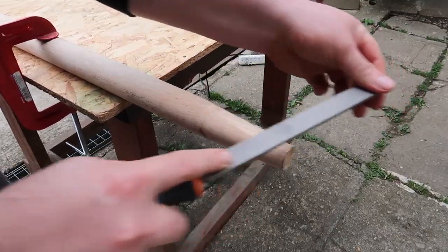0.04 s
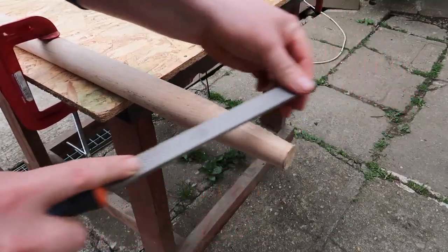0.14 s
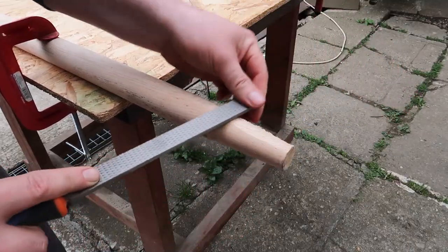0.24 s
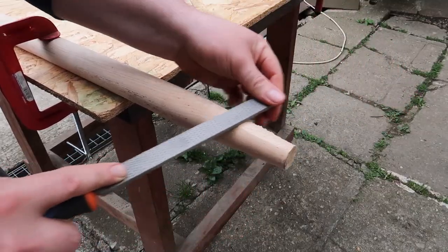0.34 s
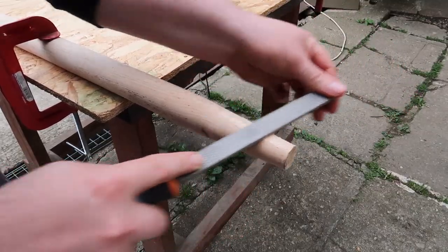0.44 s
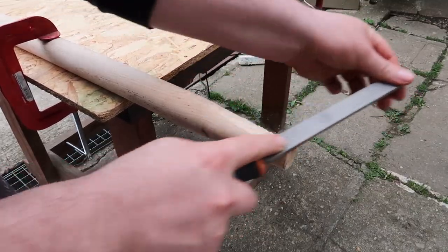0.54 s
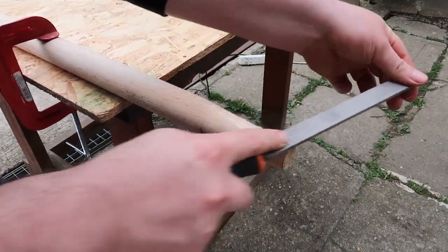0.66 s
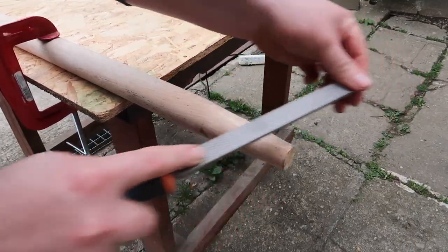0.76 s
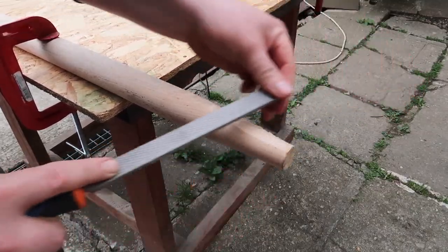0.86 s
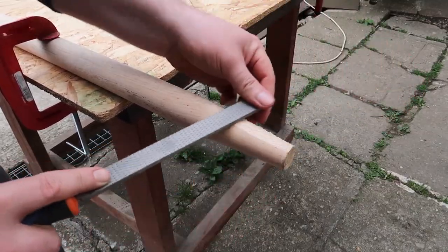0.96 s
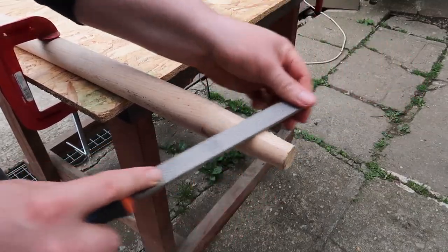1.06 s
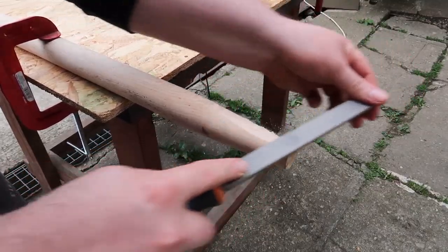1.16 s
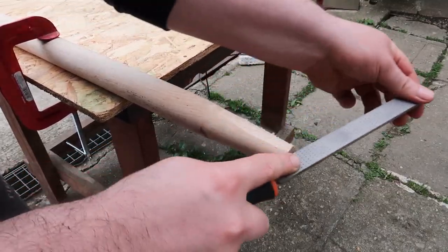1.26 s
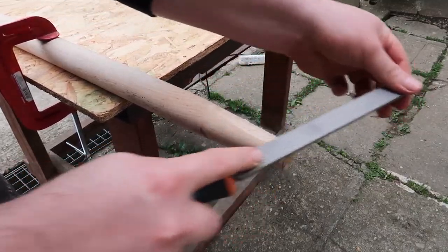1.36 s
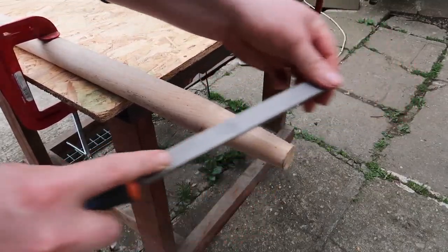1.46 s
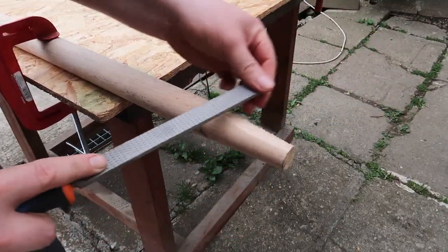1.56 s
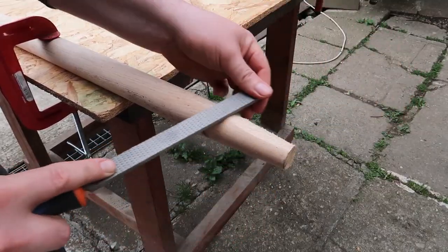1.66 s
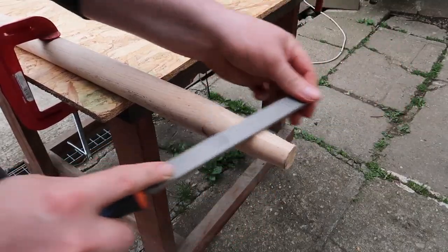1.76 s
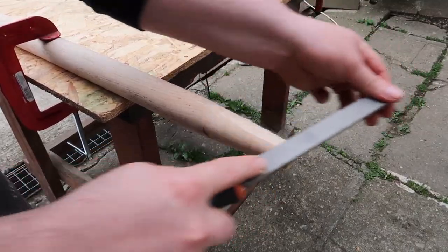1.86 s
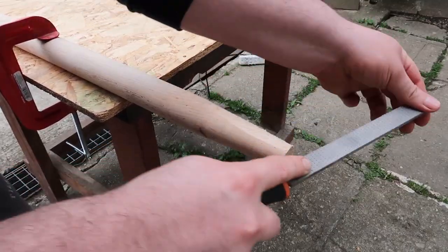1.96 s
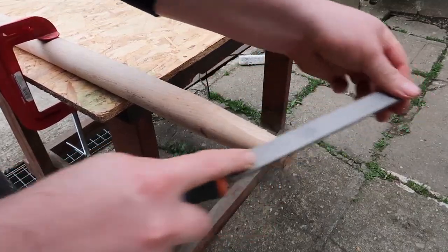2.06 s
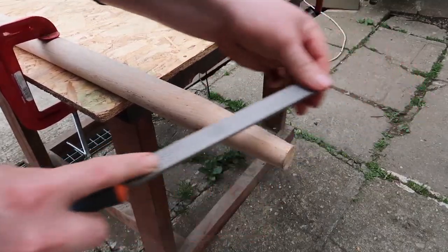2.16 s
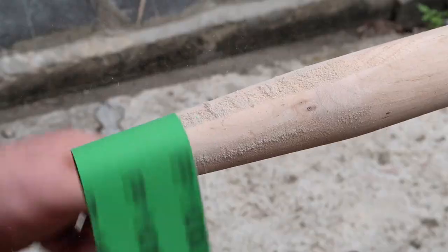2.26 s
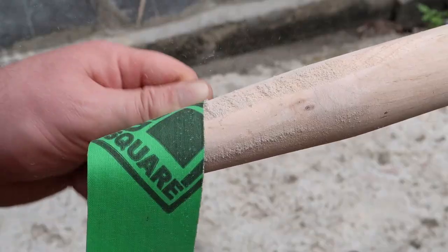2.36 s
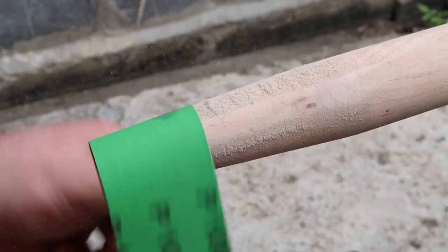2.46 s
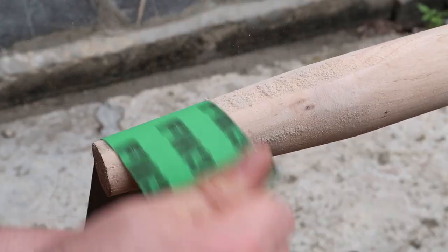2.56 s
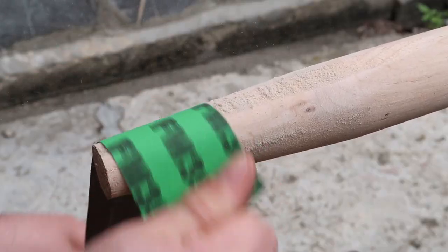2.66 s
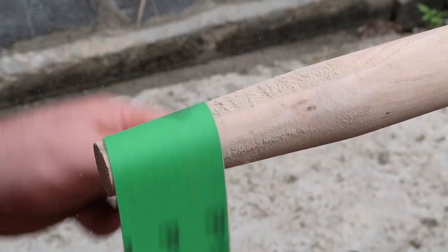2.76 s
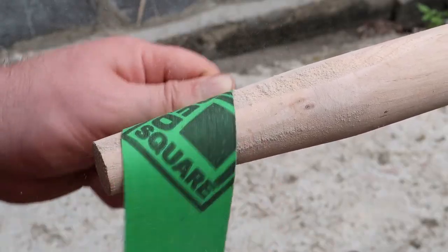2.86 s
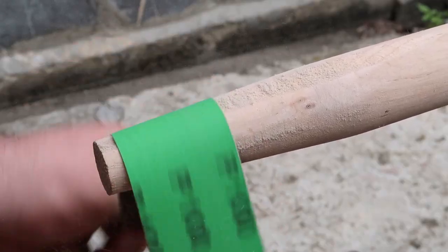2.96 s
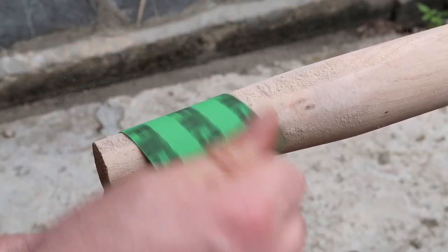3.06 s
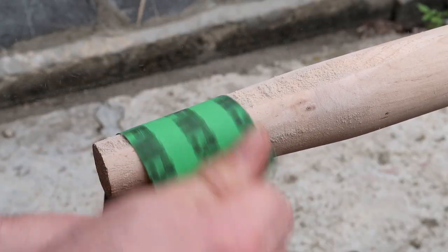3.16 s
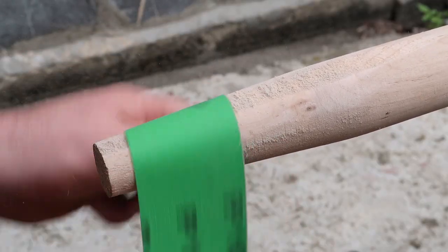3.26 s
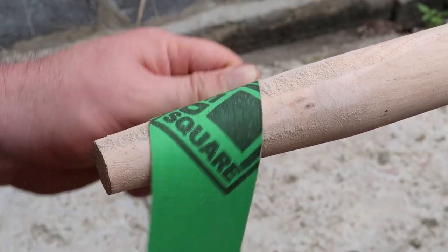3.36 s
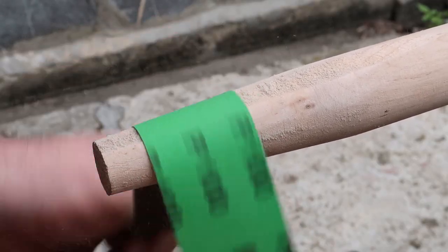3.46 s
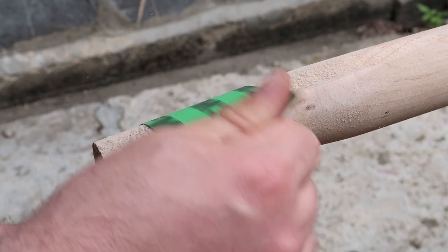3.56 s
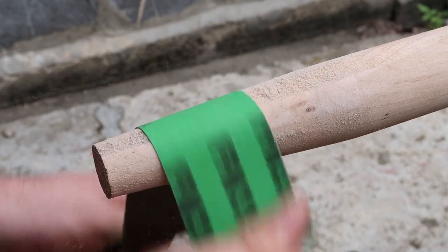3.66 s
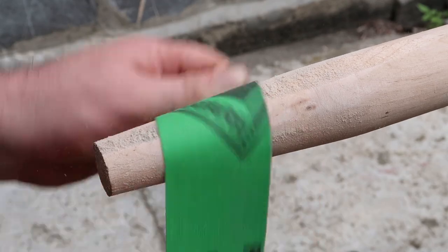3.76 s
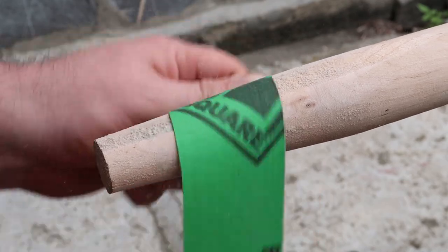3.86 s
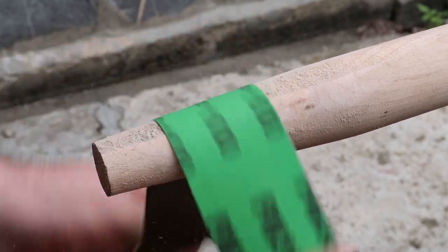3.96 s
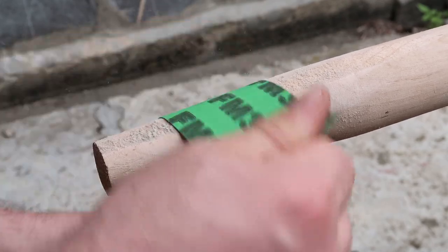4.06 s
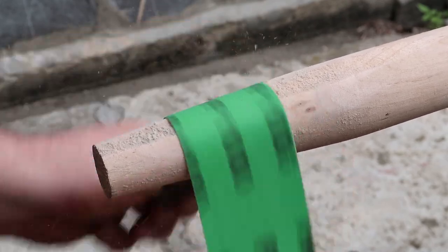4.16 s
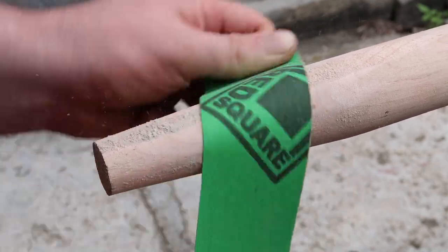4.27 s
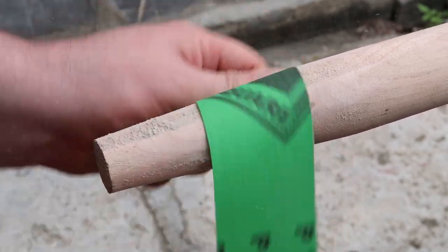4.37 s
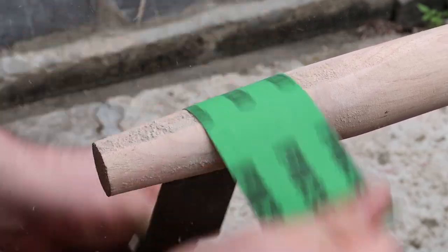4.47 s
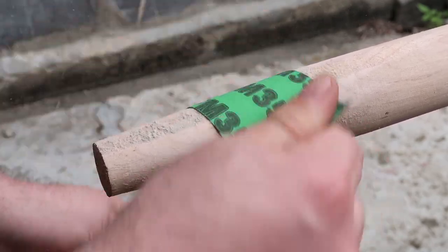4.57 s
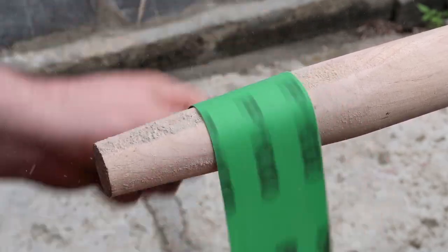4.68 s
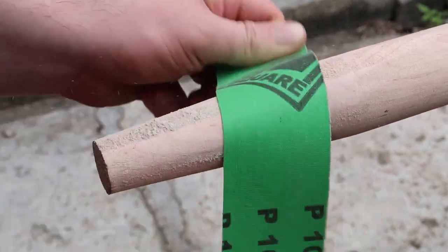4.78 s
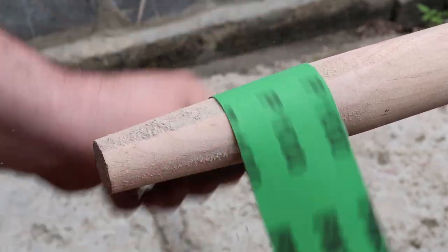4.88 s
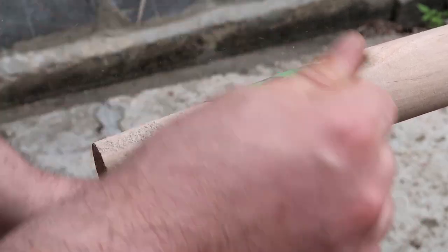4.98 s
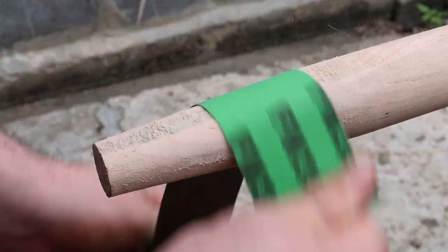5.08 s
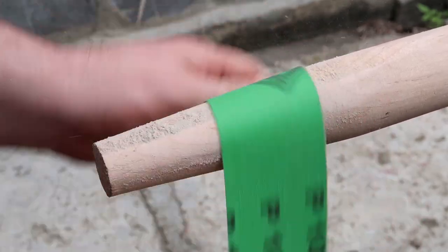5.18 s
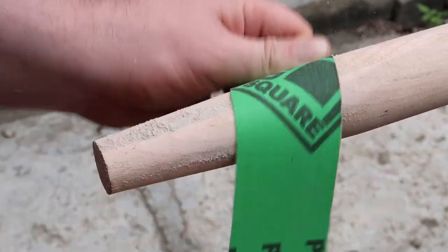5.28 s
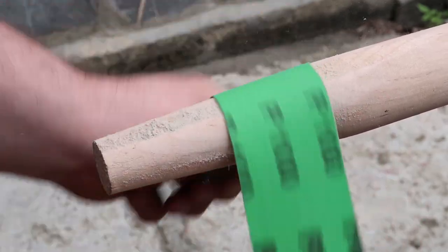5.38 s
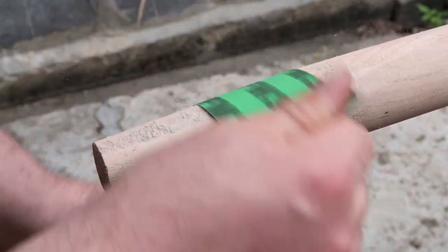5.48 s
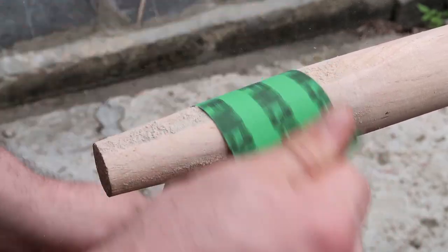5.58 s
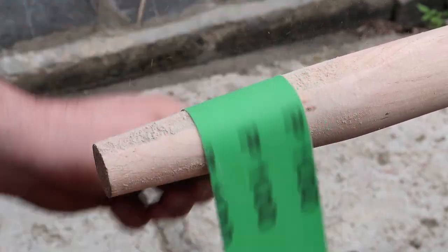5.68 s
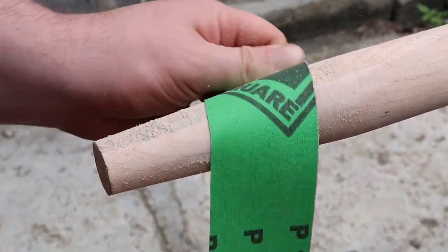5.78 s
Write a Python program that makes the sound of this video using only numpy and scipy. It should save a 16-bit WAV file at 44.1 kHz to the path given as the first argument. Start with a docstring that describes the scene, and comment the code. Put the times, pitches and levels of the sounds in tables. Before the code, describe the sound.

Close up in a quiet yard, the tail of a file stroke is followed by three more pushes, each starting with a dull knock and growing into a coarse, resonant rasp. A dove and a small trilling bird call faintly. Just after two seconds, an abrasive strip begins fast, steady to-and-fro sanding, bright and gritty, about four pulls a second, until the end.

```python
"""A wooden handle clamped to an outdoor bench is shaped by hand, heard from close by.
It opens in the last moments of a file push; three more follow, each begun by a knock of the file:
noise grains in time with the teeth excite wood resonances. A bird, gliding tones, and a dove, arched
tones, call faintly meanwhile. After two seconds an abrasive strip is pulled quickly to and fro, its
grit noise read off at the sliding speed. Filtered noise makes the air and the faint far traffic."""
import sys
import numpy as np
from scipy import signal
from scipy.fft import rfft, irfft, next_fast_len
from scipy.io import wavfile
from scipy.ndimage import map_coordinates

SR = 44100
rng = np.random.default_rng(int(sys.argv[2]) if len(sys.argv) > 2 else 0)


def file_out(sig):
    """Save sig as 16-bit WAV at sys.argv[1]."""
    # one column per channel
    cols = np.atleast_2d(sig).T
    # limit, then scale
    lim = np.clip(cols, -1, 1)
    pcm = np.round(lim * 32767).astype(np.int16)
    wavfile.write(sys.argv[1], SR, pcm)


N = 257103
TIME = np.arange(N) / SR
SIZE = next_fast_len(N + SR // 2)
FREQ = np.maximum(np.arange(SIZE // 2 + 1) * SR / SIZE, 1)
# Signals of two rows hold mid and side.


def undb(db):
    """Level: decibels become an amplitude ratio."""
    return 10 ** (np.asarray(db) / 20)


def unit(x):
    """Normalisation: the rms becomes 1."""
    return x / np.sqrt(np.mean(x ** 2))


def apply(x, response):
    """Linear filtering: the spectrum is multiplied by a frequency response."""
    return irfft(rfft(x, SIZE) * response, SIZE)[..., :N]


def colour(points):
    """Minimum phase: folding the cepstrum makes a response through (Hz, dB) points causal."""
    hz, db = np.transpose(points)
    log_gain = np.log(undb(np.interp(np.log(FREQ), np.log(hz), db)))
    cepstrum = irfft(log_gain, SIZE)
    return np.exp(rfft(np.r_[cepstrum[0], 2 * cepstrum[1:SIZE // 2]], SIZE))


def resonances(modes):
    """Modal resonance: each mode adds a narrow peak to a flat response; the factors multiply."""
    peaks = [1 + undb(db) / (1 + 1j * (FREQ ** 2 - hz ** 2) / (FREQ * width)) for hz, width, db in modes]
    return np.prod(peaks, axis=0)


def below(hz):
    """Second-order low-pass response."""
    return 1 / (1 + 1j * np.sqrt(2) * FREQ / hz - (FREQ / hz) ** 2)


def above(hz):
    """Second-order high-pass response."""
    return below(hz) * (FREQ / hz) ** 2


def share_under(hz):
    """Crossover: the share of each frequency that lies under a soft edge."""
    return 1 / (1 + (FREQ / hz) ** 4)


def echoes(t60, wet_db):
    """Reverberation: a direct sound and a dense tail that decays by 60 dB in t60 seconds."""
    tail = rng.standard_normal(N) * np.exp(-np.log(1000) * TIME / t60)
    wet = undb(wet_db) * rfft(unit(tail), SIZE) / np.sqrt(N)
    return (1 + wet) / np.sqrt(1 + undb(2 * wet_db))


def walk(rate):
    """Random modulation: noise low-passed at a rate in Hz, with an rms of 1."""
    return unit(apply(rng.standard_normal(N), below(rate)))


def grains(rate, spread_db):
    """Shot noise: tiny fractures of uneven size, at a given rate per second."""
    strikes = rng.random((2, N)) < rate / SR
    sizes = unit(rng.standard_normal((2, N)) * undb(spread_db * rng.standard_normal((2, N))))
    return strikes * sizes / np.sqrt(np.clip(rate / SR, 1e-3, 1))


PATCHY_FROM_HZ = 1960  # patches reach their full depth above this


def patchy(x, patch_db, rate, width_hz):
    """Random modulation: patches of the spectrum swell and fade independently, deepest in the treble."""
    hz, s, frames = signal.stft(x, SR, nperseg=512)
    chance = rng.standard_normal((256, 512))
    places = np.meshgrid(hz / width_hz, s * rate, indexing="ij")
    field = unit(map_coordinates(chance, places, order=3, mode="wrap"))
    depth_db = patch_db * np.minimum(hz / PATCHY_FROM_HZ, 1)[:, None]
    gain = undb(depth_db * field)
    gain = gain / np.sqrt(np.mean(gain ** 2, axis=1, keepdims=True))
    return signal.istft(frames * gain, SR)[1][..., :N]


def arch(start, length):
    """Half-sine envelope: a smooth rise and fall between 0 and 1."""
    return np.sin(np.pi * np.clip((TIME - start) / length, 0, 1))


def held(start, end, attack_s, release_s):
    """Envelope: linear attack, hold and exponential release."""
    return np.clip((TIME - start) / attack_s, 0, 1) * np.exp(-np.maximum(TIME - end, 0) / release_s)


def passing(s, half):
    """Approach and recession: the level peaks at s and halves at a distance of half, in seconds."""
    return 1 / (1 + ((TIME - s) / half) ** 2)


def tone(hz):
    """Frequency modulation: a sine of moving pitch, with an rms of 1."""
    return unit(np.sin(2 * np.pi * np.cumsum(hz) / SR))


# Spectrum of the open air. Each row: frequency in Hz, relative level in dB.
AIR_COLOUR = [(20, -21.5), (48, -2), (90, -9), (200, -11), (500, -15), (1000, -18), (2000, -25.5),
              (4000, -27), (8000, -39), (15000, -54)]
AIR_DB = -60.5  # mean level in dB


def open_air():
    """Ambient noise: coloured noise whose level wanders at random."""
    noise = unit(apply(rng.standard_normal((2, N)), colour(AIR_COLOUR)))
    return noise * undb(AIR_DB + 2.8 * walk(4.5))


# Far vehicles. Each row: nearest moment in s, half length in s, level there in dB before flutter.
VEHICLES = [(4.407, 0.14, -59), (5.298, 0.53, -66)]


def traffic():
    """Distant noise sources: dull tyre noise swells and recedes with a slight flutter of level."""
    tyres = colour([(50, -18), (110, -17.0), (250, 0.0), (450, 2.5), (700, -8.0), (2000, -59.0), (8000, -68)])
    noise = unit(apply(rng.standard_normal((2, N)), tyres))
    swell = sum(undb(db) * passing(s, half) for s, half, db in VEHICLES)
    return noise * swell * undb(1.68 * walk(13.0))


# nearest moment and half length in s, centre in Hz, level in dB at the nearest moment
RUMBLE_S, RUMBLE_HALF_S, RUMBLE_HZ, RUMBLE_DB = 1.85, 0.98, 44, -63


def low_rumble():
    """Narrow-band noise: a low rumble swells and fades once."""
    band = (above(RUMBLE_HZ) * below(RUMBLE_HZ)) ** 2
    noise = unit(apply(rng.standard_normal((2, N)), band))
    return noise * undb(RUMBLE_DB) * passing(RUMBLE_S, RUMBLE_HALF_S)


# Coos of a dove. Each row: start in s, length in s, top pitch in Hz, level in dB before the echoes.
DOVE_COOS = [(0.108, 0.22, 493, -58.5), (.325, 0.084, 535, -47), (0.705, 0.2, 463, -61),
             (2.14, 0.16, 507, -61.5)]
COO_ARCH, COO_WAVER_HZ = 0.0383, 18  # rise and fall as a share of pitch; rms random waver in Hz


def dove():
    """Frequency glide: each coo rises and sinks with its loudness, blurred by reflecting walls."""
    coos = np.zeros(N)
    for s, length, hz, db in DOVE_COOS:
        swell = arch(s, length)
        pitch = hz * (1 + COO_ARCH * (swell - 1)) + COO_WAVER_HZ * walk(33)
        coos += swell * undb(db) * tone(pitch)
    return np.array([apply(coos, echoes(t60=0.68, wet_db=-6)) for _ in range(2)])


# Chirrs of a small bird. Each row: start in s, length of the falling trill in s,
# whistle level in dB and starting trill level in dB, both before flutter and echoes.
BIRD_CHIRRS = [(0.146, 0.12, -62, -58.5), (.778, 0.33, -54, -55), (1.486, 0.11, -81, -70),
               (1.78, 0.073, -59.5, -55.5)]
WHISTLE_HZ, WHISTLE_S = 6290, 0.029  # mean pitch and length
TRILL_HZ, TRILL_DEPTH_HZ = 5500, 604  # starting pitch; scale of the swing about the falling pitch
FALL_HZ_PER_S, FADE_DB_PER_S = 7700, -55
TRILL_SWELL_S = 0.073  # the trill begins to swell in this long before the whistle


def small_bird():
    """Frequency modulation: short whistles break into falling trills, blurred by reflecting walls."""
    song = np.zeros(N)
    trill = 0.59 * np.sin(2 * np.pi * 70 * TIME) + 0.48 * walk(249)
    for s, length, whistle_db, trill_db in BIRD_CHIRRS:
        age = np.clip(TIME - s - WHISTLE_S, 0, length)
        song += arch(s, WHISTLE_S) * undb(whistle_db) * tone(WHISTLE_HZ + 90 * trill)
        pitch = TRILL_HZ - FALL_HZ_PER_S * age + TRILL_DEPTH_HZ * trill + 200 * walk(24.73)
        end = s + WHISTLE_S + length
        swell = held(s - TRILL_SWELL_S, end, 2 * TRILL_SWELL_S + WHISTLE_S, 0.0091)
        song += swell * undb(trill_db + FADE_DB_PER_S * age) * tone(pitch)
    return np.array([apply(song * undb(3.2 * walk(60)), echoes(t60=0.14, wet_db=7.0)) for _ in range(2)])


SHUDDER_DB = -16  # the shuddering bench, relative to the drag


def bench_shudder(drag):
    """Forced vibration: low noise in the bench follows the drag of the file."""
    return unit(apply(rng.standard_normal((2, N)), above(33) * below(73))) * drag * undb(SHUDDER_DB)


# The clamped handle and the bench rock.
# Each row: start in s, frequency in Hz, level in dB before the onset and decay, 60 dB decay time in s.
ROCKING = [(.28, 41, -44.5, 0.51), (0.344, 72, -32, 0.12), (1.558, 54.4, -40, 0.15),
           (2.014, 199, -23, 0.16)]
THUD_SIDE_DB = 0  # side minus mid, before the stereo spread


def thuds():
    """Damped oscillation: low swings of handle and bench set in quickly and decay exponentially."""
    out = np.zeros((2, N))
    for s, hz, db, t60 in ROCKING:
        age = np.maximum(TIME - s, 0)
        swing = undb(db) * (1 - np.exp(-age / 0.0017)) * np.exp(-np.log(1000) * age / t60)
        mid = np.sin(2 * np.pi * hz * age)
        side = undb(THUD_SIDE_DB) * np.cos(2 * np.pi * hz * age)
        out += swing * np.array([mid, side])
    return out


# The file lands on the wood.
# Each row: moment in s, peak level in dB before the echoes, contact hardness as a low-pass edge in Hz.
FILE_LANDINGS = [(0.374, -21.5, 800), (1.076, -23.5, 800), (1.747, -28.5, 1100)]
# Spectrum of the knock. Each row: frequency in Hz, level in dB.
KNOCK_COLOUR = [(60, -31), (200, 0), (350, -8), (560, 4.5), (800, -1.5), (1300, -12.5), (5000, -15)]
# Resonances of handle, vice and file, also used by the rasp below.
# Each row: frequency in Hz, width in Hz, lift in dB.
HANDLE_MODES = [(203.7, 29, 6.5), (278.3, 12.5, 6), (325.4, 15, 9.5), (406, 22, 6), (475.4, 13.5, 6),
                (558, 30, -6), (789, 28, 2), (950, 28, 2), (1245, 84, -0.5), (1710, 17, 2), (1952, 12, -2),
                (2274, 190, 2), (2724, 24, -3), (8100, 200, 0)]


def landings():
    """Impact excitation: the file knocks on the handle, which rattles briefly in the vice."""
    out = np.zeros((2, N))
    wood = colour(KNOCK_COLOUR) * resonances(HANDLE_MODES)
    for s, db, hard_hz in FILE_LANDINGS:
        age = np.maximum(TIME - s, 0)
        # the steel chatters on the wood for a few milliseconds before it settles
        chatter = np.sin(2 * np.pi * 500 * age) * age / 0.0069 * np.exp(-age / 0.002)
        rattle = rng.standard_normal((2, N)) * (age > 0) * np.exp(-age / 0.0062)
        knock = apply(chatter + 1.5 * rattle, wood * below(hard_hz))
        out += undb(db) * knock / np.abs(knock).max()
    return out


# Pushes of the file. Each row: start in s, fastest moment in s, lift-off in s,
# drag level in dB and bite level in dB, both at full speed and before the echoes.
FILE_PUSHES = [(-.33, -.055, 0.033, -34.5, -38), (.395, .61, .702, -35, -37),
               (1.08, 1.29, 1.363, -33.5, -37), (1.75, 1.972, 2.022, -34, -36)]
# speeds at start and lift-off as shares of full speed (the start before its rise); shape of the rise
START_SPEED, LIFT_SPEED, SPEED_CURVE = .12, .42, 1.15
# the sound grows as these powers of the speed
DRAG_POWER, BITE_POWER, SPLINTER_POWER = 0.49, 1.49, 1.7
SPLINTER_DB = -3  # torn fibres, relative to the bite at full speed
PRESS_S, RELEASE_S = .03, .026  # the file takes hold and lets go
FREE_S = 0.018  # the teeth come free of the fibres sooner than the drag dies


def file_motion():
    """Kinematics: each push gathers speed and brakes; drag, bite and splinter are powers of speed."""
    drag, bite, splinter, speed = np.zeros((4, N))
    for start, fastest, lift, drag_db, bite_db in FILE_PUSHES:
        progress = np.clip((TIME - start) / (fastest - start), 0, 1)
        rise = np.sin(np.pi / 2 * progress ** SPEED_CURVE) ** 2
        brake = np.clip((TIME - fastest) / (lift - fastest), 0, 1) ** 2
        v = (START_SPEED + (1 - START_SPEED) * rise) * (1 - (1 - LIFT_SPEED) * brake)
        v = np.clip(v, 0, 1)
        contact = held(start, lift, PRESS_S, RELEASE_S)
        cutting = held(start, lift, PRESS_S, FREE_S)
        drag += contact * undb(drag_db) * v ** DRAG_POWER
        bite += cutting * undb(bite_db) * v ** BITE_POWER
        splinter += cutting * undb(bite_db + SPLINTER_DB) * v ** SPLINTER_POWER
        speed += contact * v
    return drag, bite, splinter, speed


# Broad spectrum of the rasping. Each row: frequency in Hz, level in dB.
RASP_COLOUR = [(30, -39), (70, -6.5), (140, -5), (200, -4), (380, -5.5), (700, -1.5), (1200, -7.5),
               (1600, -10.5), (2400, -12), (3300, -16.5), (5200, -21.5), (8200, -29), (13000, -37.5),
               (15500, -51)]
TOOTH_HZ = 520  # mean rate of passing tooth rows at full speed
CHATTER_DB, CHATTER_HZ = 0.5, 43.7  # the teeth bite unevenly: rms depth, rate
# the clamped wood rings on after each push: decay time, level, upper edge
RING_T60_S, RING_DB, RING_HZ = 0.52, -11, 1550


def file_strokes(drag, bite, splinter, speed):
    """Stick-slip: tooth rows load and tear fibres; slowly they drag, at speed they bite and splinter."""
    tooth_phase = np.cumsum(TOOTH_HZ * speed * (1 + .15 * walk(60))) / SR
    # each row of teeth loads the fibres and lets go; many small fractures ride on that push
    catch = unit(np.exp(-(tooth_phase % 1) / 1.6)) * undb(CHATTER_DB * walk(CHATTER_HZ))
    force = grains(4000 + 12000 * speed, spread_db=0.1) * catch
    rasp = apply(force, colour(RASP_COLOUR) * resonances(HANDLE_MODES))
    rasp = patchy(rasp, patch_db=2.5, rate=42, width_hz=263)
    lows, lows_and_mids = share_under(1200), share_under(4200)
    low = apply(rasp, lows)
    middle = apply(rasp, lows_and_mids - lows)
    top = apply(rasp, 1 - lows_and_mids)
    stroke = drag * unit(low) + (bite * middle + splinter * top) / np.std(middle)
    ringing = 1 + (echoes(RING_T60_S, RING_DB) - 1) * below(RING_HZ)
    return apply(stroke, ringing)


# a pull is fastest at these shares of its length, going out and coming back; shape of the ramp
OUT_FASTEST, BACK_FASTEST, PULL_CURVE = .58, .41, 1.15
REST_SHARE, CREEP_SPEED = 0.027, .03  # the hands rest at each turn while the strip creeps
TAUT_DB, TAUT_CURVE = 18.5, 4.4  # the strip tightens towards the far end of its travel


def strip_motion(turn):
    """Kinematics: sliding speed (share of full) and tension (dB); turn counts pulls, even ones going out."""
    fastest = np.where(turn % 2 < 1, OUT_FASTEST, BACK_FASTEST)
    phase = turn % 1
    ramp = np.minimum((phase - REST_SHARE) / (fastest - REST_SHARE), (1 - phase) / (1 - fastest))
    speed = CREEP_SPEED + np.sin(np.pi / 2 * np.clip(ramp, 0, 1)) ** PULL_CURVE
    reach = np.abs(np.sin(np.pi / 2 * turn)) ** 2
    return speed, TAUT_DB * reach ** TAUT_CURVE


# Spectrum of the grit before it is read off at speed. Each row: frequency in Hz, level in dB.
GRIT_COLOUR = [(600, -21), (1500, -23), (2500, 1), (3300, -0.5), (4500, 2), (6300, 0.5), (7800, -2.5),
               (12500, -6.5), (17000, -12), (20000, -8)]
# Broad ringing of the strip itself. Each row: frequency in Hz, width in Hz, lift in dB.
CLOTH_RESONANCES = [(2330, 230, -17.5), (4080, 410, -3.5)]
GRIT_DB = -45  # mean level at a speed of 1, before the filter and the force of the pull


def grit_hiss(speed):
    """Scanning of roughness: a surface read off at the sliding speed brightens and dulls with it."""
    surface = unit(apply(grains(20000, spread_db=-1.0), colour(GRIT_COLOUR)))
    travel = np.cumsum(np.clip(.42 + .6 * speed, .1, 1.2))
    hiss = np.array([map_coordinates(row, [travel], order=3, mode="wrap") for row in surface])
    loudness = speed ** 1.19 * undb(GRIT_DB + 1.0 * walk(57))
    hiss = apply(hiss * loudness, below(15600) * resonances(CLOTH_RESONANCES))
    hiss = patchy(hiss, patch_db=1.2, rate=12, width_hz=1500)
    return patchy(hiss, patch_db=2.5, rate=45, width_hz=200)


# Spectrum of the wood under the grit. Each row: frequency in Hz, level in dB.
WOOD_COLOUR = [(80, -27), (250, -33), (450, -12.5), (700, -11), (1200, -8.5), (1800, -3.5), (2700, -4),
               (4000, -6), (7000, -38), (15000, -60)]
# Resonances of the taut strip on the handle. Each row: frequency in Hz, width in Hz, lift in dB.
TAUT_STRIP_MODES = [(996, 48, 10), (1250, 43, 15.5), (1520, 74, 2), (2690, 540, -11.5)]
WOOD_DB = -56  # slack strip at a speed of 1, before smoothing and force


def sanded_wood(scratches, speed, tension_db):
    """Driven resonance: scratches excite the wood, hardest when the strip is taut."""
    wood = unit(apply(scratches, colour(WOOD_COLOUR) * resonances(TAUT_STRIP_MODES)))
    return wood * speed ** 1.67 * undb(WOOD_DB + tension_db)


# Spectrum of the strip dragging late in an outward pull. Each row: frequency in Hz, level in dB.
THRUM_COLOUR = [(80, -17), (280, 4), (750, 5), (1300, 4), (1800, -2), (2600, 11), (4000, -25), (15000, -62)]
THRUM_DB = -46.5  # at its height, before smoothing and force


def handle_thrum(turn):
    """Friction drive: towards the end of each outward pull the strip drags and the handle thrums."""
    drag = np.exp(-((turn % 2 - .78) / .11) ** 2)
    return unit(apply(grains(3000, spread_db=-3.5), colour(THRUM_COLOUR))) * drag * undb(THRUM_DB)


SCUFF_DB, SCUFF_RISE_S, SCUFF_FALL_S = -49, 0.01, 0.058  # level before the envelope and force


def reversal_scuff(scratches, since):
    """Breakaway from static friction: on each reversal the grit breaks loose with a short scuff."""
    noise = unit(apply(scratches, above(2600) * below(4500) ** 2))
    envelope = (1 - np.exp(-since / SCUFF_RISE_S)) * np.exp(-since / SCUFF_FALL_S)
    return noise * envelope * undb(SCUFF_DB)


# Pulls of the abrasive strip, alternately out and back; a pull lasts until the next row starts.
# Each row: start in seconds, relative force in dB.
STRIP_PULLS = [(2.255, -1), (2.499, -0.5), (2.747, -0.5), (2.983, -1), (3.241, -1), (3.478, -1),
               (3.715, -0.8), (3.95, -0.7), (4.189, -1), (4.422, -1.4), (4.675, -3.5), (4.909, -3),
               (5.139, -3), (5.39, -1.55), (5.65, -3.2), (5.91, -1.5)]
SMOOTHING_DB_PER_S = -1  # the wood quietens as it gets smooth


def sanding():
    """Sliding friction: hiss, wood, thrum and scuff follow the speed, tension and turns of the strip."""
    starts, force_db = np.transpose(STRIP_PULLS)
    turn = np.interp(TIME, starts, np.arange(len(starts)))
    pull = turn.astype(int)
    speed, tension_db = strip_motion(turn)
    speed = np.clip(speed * undb(.7 * walk(14)), .005, 2)
    roughness = undb(SMOOTHING_DB_PER_S * np.maximum(TIME - starts[0], 0))
    hiss = grit_hiss(speed)
    scratches = grains(4000 + 16000 * speed, spread_db=-0.5)
    wood = sanded_wood(scratches, speed, tension_db)
    thrum = handle_thrum(turn)
    since = np.maximum(TIME - starts[pull] - .015, 0)
    scuff = reversal_scuff(scratches, since)
    return (TIME > starts[0]) * undb(force_db[pull]) * (hiss + roughness * (wood + thrum) + scuff)


# Stereo spread of the near work, mostly in the treble.
# Each row: frequency in Hz, gain of the side signal in dB.
WORK_WIDTH = [(60, -42), (300, -28.5), (700, -23.5), (1300, -16.5), (2400, -25), (4400, -12), (8000, -3.5),
              (15000, -2.5)]
# Stereo spread of yard and bench, which sound from all around.
# Each row: frequency in Hz, gain of the side signal in dB.
AROUND_WIDTH = [(40, -29), (90, -24), (400, -18.5), (1000, -10.5), (3000, -4), (10000, -1)]
PORT_LAG_S = 1.2e-5  # sound reaches the right channel this much later


def scene():
    """Superposition: the work rings briefly off bench and paving; mid and side become left and right."""
    drag, bite, splinter, speed = file_motion()
    work = file_strokes(drag, bite, splinter, speed) + landings() + sanding()
    work = apply(work, echoes(t60=0.19, wet_db=-10))
    yard = open_air() + traffic() + low_rumble()
    around = yard + dove() + small_bird() + bench_shudder(drag) + thuds()
    mid = work[0] + around[0]
    side = apply(work[1], colour(WORK_WIDTH)) + apply(around[1], colour(AROUND_WIDTH))
    left = (mid + side) * undb(0.11)
    right = apply(mid - side, np.exp(-2j * np.pi * FREQ * PORT_LAG_S))
    return np.array([left, right])


TOP_HZ = 15200  # upper edge of the sound


def record(dry):
    """Band limiting: a steep elliptic low-pass cuts the top."""
    return signal.sosfilt(signal.ellip(8, .2, 70, TOP_HZ, fs=SR, output="sos"), dry)


dry = scene()
out = record(dry)
file_out(out)
```